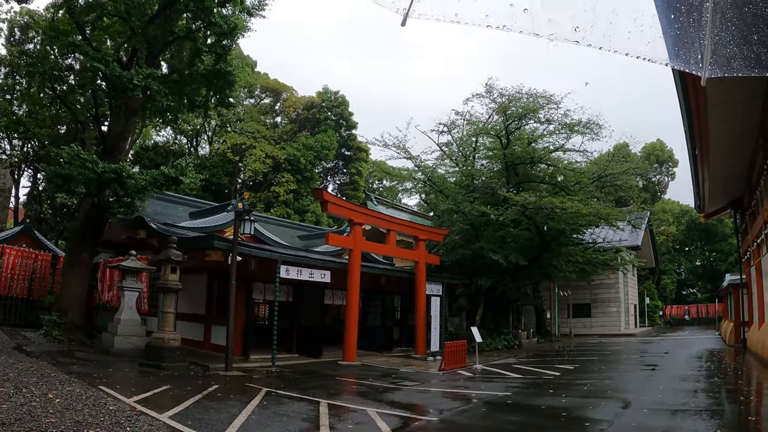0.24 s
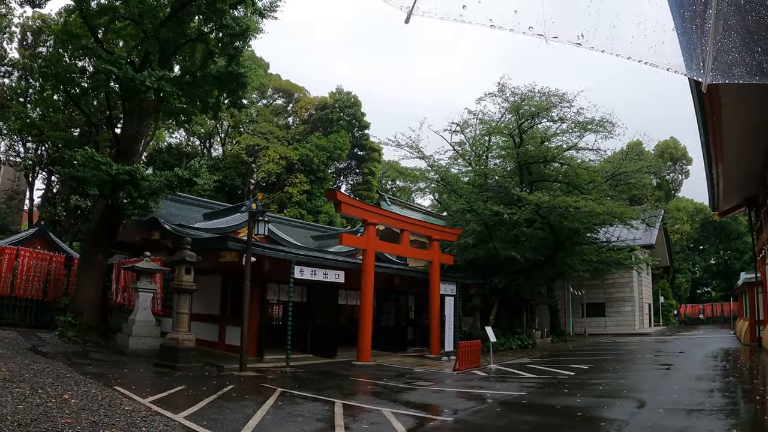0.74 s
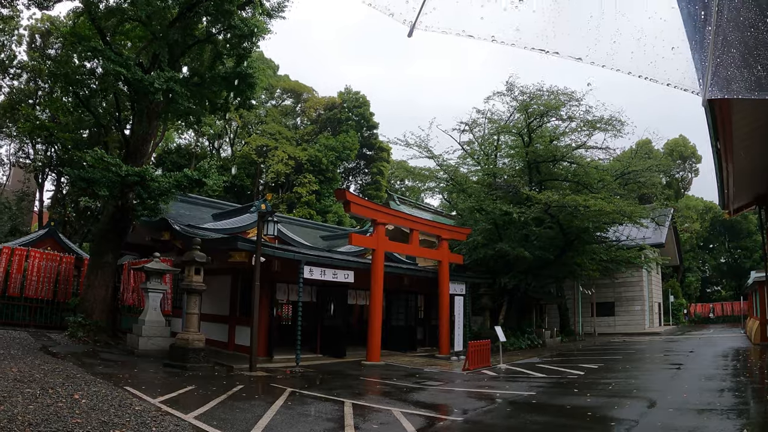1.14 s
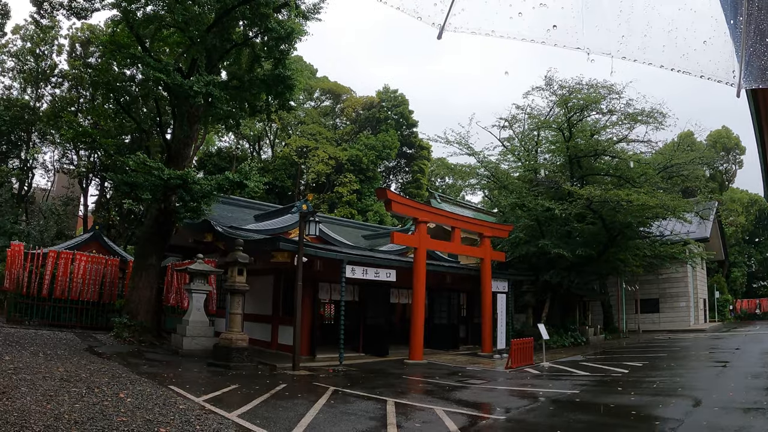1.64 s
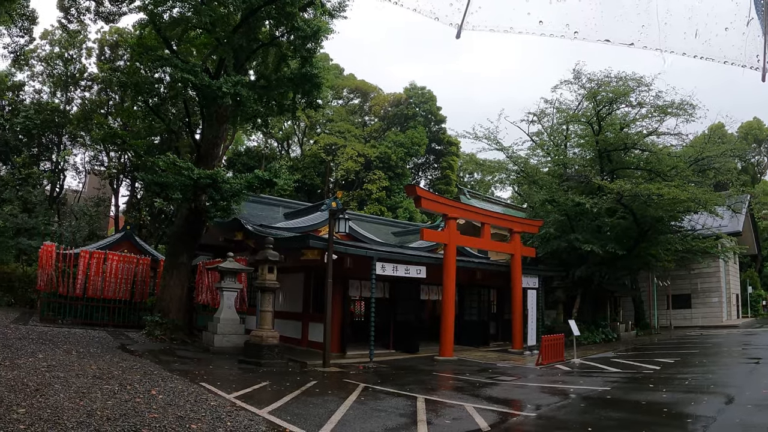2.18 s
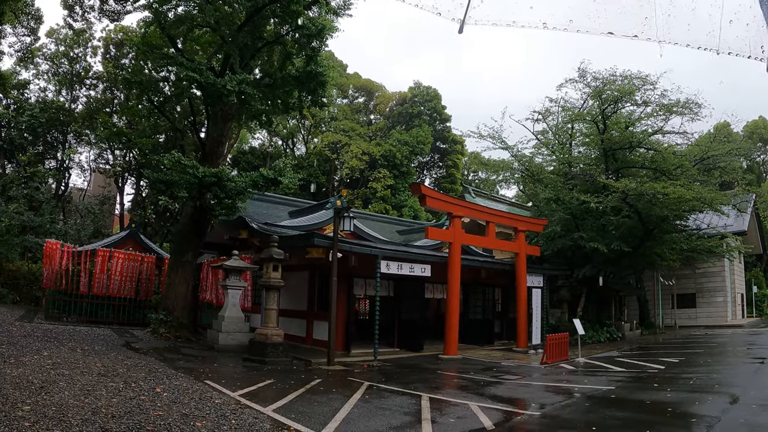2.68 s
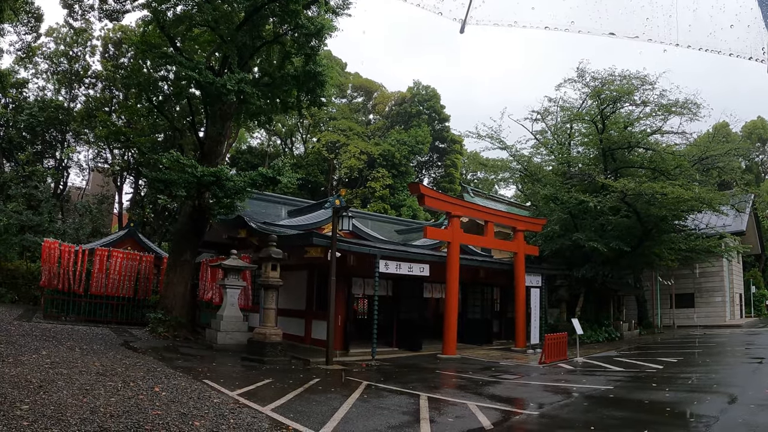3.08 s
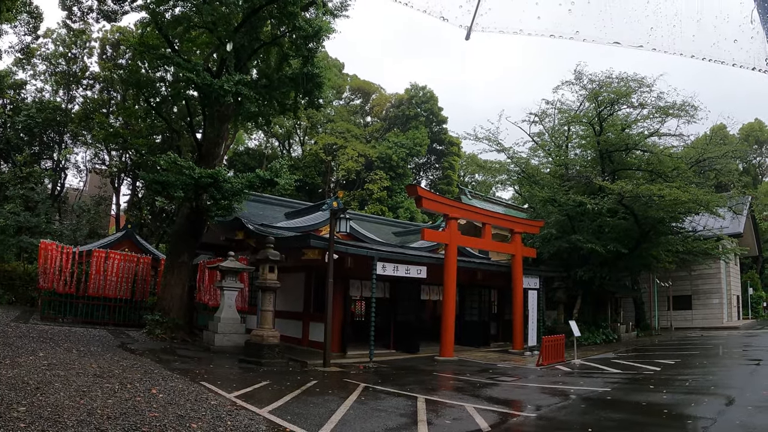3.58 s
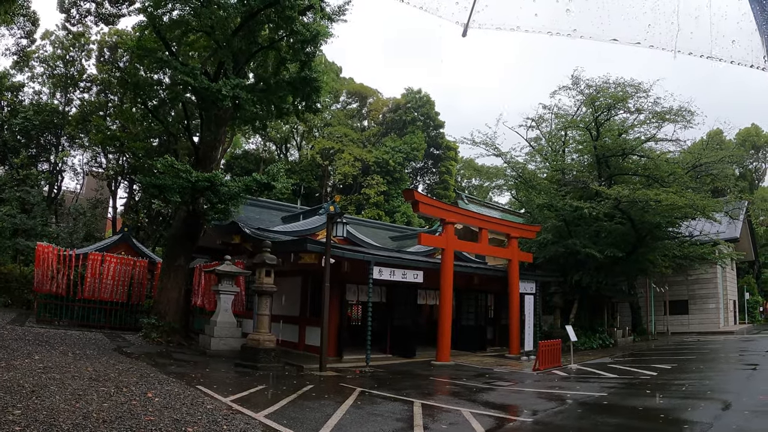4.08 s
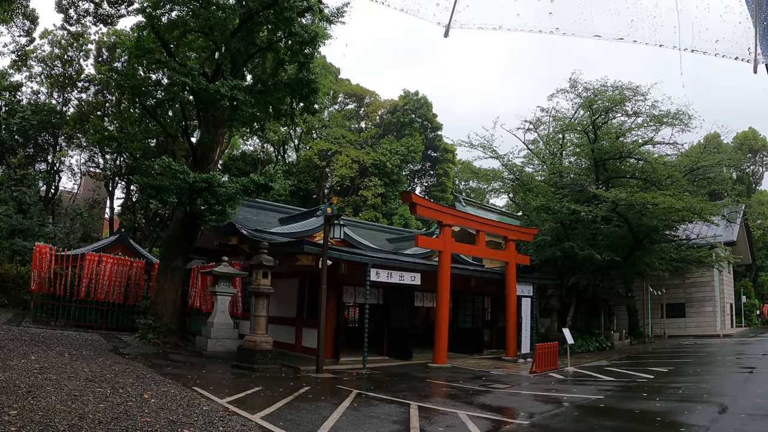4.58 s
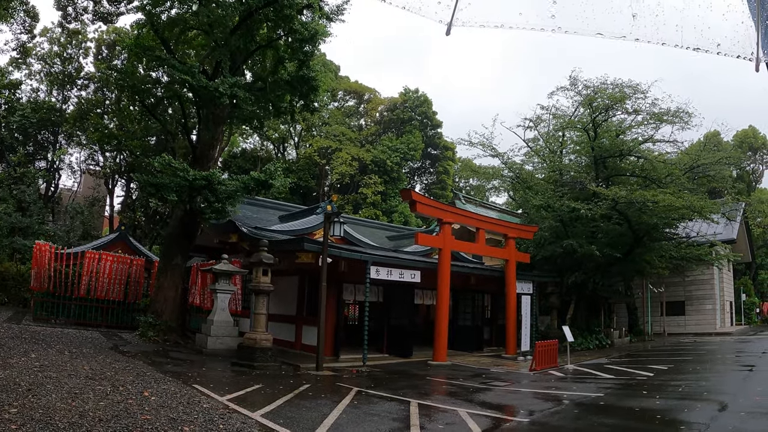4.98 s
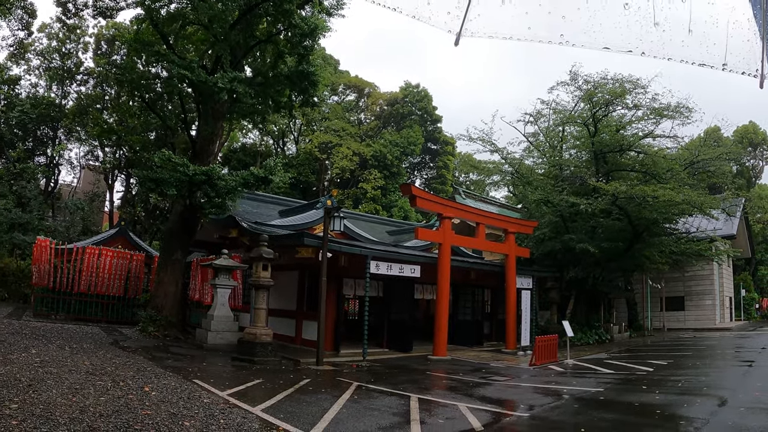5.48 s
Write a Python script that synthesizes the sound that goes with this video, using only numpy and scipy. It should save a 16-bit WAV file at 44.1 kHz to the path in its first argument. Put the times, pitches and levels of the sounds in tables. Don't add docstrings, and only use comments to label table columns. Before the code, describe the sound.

Irregular rain pelts an umbrella held right above the microphone. Punchy, rounded plastic pops come singly and in quick pairs, some hollow, some tighter and crisper near the ribs, mixed with soft pats, sharp ticks and wet sputters. The strongest blows land past the middle; the drumming continues to the end. Outdoors behind it, quiet rain hisses on stone and leaves over a low, wavering distant rumble. Close mono sound, almost no echo.

```python
import sys
import numpy as np
from scipy import signal
from scipy.fft import rfft, irfft
from scipy.io import wavfile
from scipy.ndimage import uniform_filter1d

SR = 44100
rng = np.random.default_rng(int(sys.argv[2]) if len(sys.argv) > 2 else 0)


def ratio(d):
    e = np.asarray(d, float) / 20
    return 10 ** e


def pcm_store(signal):
    levels = np.round(np.clip(np.atleast_2d(signal), -1, 1) * 32767)
    wavfile.write(sys.argv[1], SR, levels.astype(np.int16).T)


N = 252682


def rms_one(x):
    return x / np.sqrt(np.mean(x ** 2) + 1e-20)


def band(x, low_hz, high_hz):
    return signal.sosfilt(signal.butter(2, [low_hz, min(high_hz, .45 * SR)], "band", fs=SR, output="sos"), x)


def narrow_band(x, low_hz, high_hz):
    return band(band(x, low_hz, high_hz), low_hz, high_hz)


def drift(rate_hz):
    r = np.exp(-80 * np.pi * rate_hz / SR)
    noise = rng.standard_normal(N // 40 + 2002)
    slow = signal.lfilter([1], [1, -2 * r, r * r], noise)[2000:]
    return np.interp(np.arange(N) / 40, np.arange(len(slow)), rms_one(slow))


def coloured(spectrum, patchy_db, source):
    hz_points, db_points = np.transpose(spectrum)
    out = 0
    together = drift(15.0)
    edges = 20 * 2 ** np.arange(0, 10.1, .5)
    for k, (low, high) in enumerate(zip(edges, edges[1:])):
        middle = np.log(low * high) / 2
        level_db = np.interp(middle, np.log(hz_points), db_points, left=-60, right=-60)
        if level_db > -60:
            flicker_db = patchy_db * (.5 * together + drift(3.86))
            out = out + ratio(level_db + flicker_db) * band(source[k % 2], low, high)
    return rms_one(out)


def resonate(x, hz, t60):
    r, w = ratio(-60 / (t60 * SR)), 2 * np.pi * hz / SR
    return signal.lfilter([0, np.sin(w)], [1, -2 * r * np.cos(w), r * r], x + 1e-18)


def clicks_at(seconds, heights):
    out = np.zeros(N)
    np.add.at(out, np.clip(np.round(np.asarray(seconds) * SR).astype(int), 0, N - 1), heights)
    return out


def dying(clicks, seconds):
    return signal.lfilter([1], [1, -np.exp(-1 / (seconds * SR))], clicks + 1e-18)


def swelling(clicks, rise_s, fall_s):
    return dying(dying(clicks, rise_s) / (rise_s * SR) * 2, fall_s)


def bending_wave(stretch, softness):
    first_crest_s, growth, crest_bias = .00053, 2.33, .22
    swell_s, swell_decay = .0021, 1.21
    t = (np.arange(1200) + 1e-3) / SR / np.clip(stretch, .3, 2.5)
    rise = np.minimum(t / swell_s, 1) ** max(softness, 0)
    fall = np.exp(-swell_decay * np.maximum(t / swell_s - 1, 0))
    turns = np.log(t / first_crest_s) / np.log(growth)
    fade_in = np.clip(2 * turns + 1.6, 0, 1)
    wave = (np.cos(np.pi * turns) + crest_bias) * rise * fall * fade_in
    rounded = signal.lfilter(*signal.butter(4, 2600, fs=SR), wave)
    return signal.lfilter(*signal.butter(1, 105, "high", fs=SR), rounded)


def thuds(table):
    size = 1200
    out = np.zeros(N + size)
    t = np.arange(size) / SR
    shape = (1 - np.exp(-t / 0.0019)) * (np.exp(-t / 0.0018) + 0.033 * np.exp(-t / 0.029))
    shakes = rng.standard_normal((len(table), size)) * shape
    for (s, thud_db, stretch, softness, flutter_hz, flutter_db, _), shake in zip(table, shakes):
        flutter = rms_one(band(band(shake, flutter_hz / 2.2, flutter_hz * 1.7), 250, 1700))
        i = round(s * SR)
        out[i:i + size] += ratio(thud_db) * bending_wave(stretch, softness)
        out[i:i + size] += ratio(flutter_db - 9.0) * flutter
    return out[:N]


# (pitch [Hz], level [dB], time to die by 60 dB [s])
SHEET_TONES = [(118.5, -19, 0.034), (245, -32.5, 0.069), (533, -39, 0.15), (930, -28.5, 0.03)]


def sheet_ring(table):
    out = np.zeros(N)
    s, thud_db, *_ = np.transpose(table)
    strength_db = rng.normal(-2, 4.5, (len(table), len(SHEET_TONES)))
    for k, (hz, db, t60) in enumerate(SHEET_TONES):
        pushes = clicks_at(s + 0.002546, ratio(thud_db + db + 2.5 + strength_db[:, k]))
        out -= resonate(pushes, hz, t60)
    return out


# (pitch [Hz], level per Hz [dB])
SPLASH_COLOUR = [(1400, 5.5), (2800, 8), (4000, 1), (7500, 2.5), (10500, -25), (13500, -6), (16000, -9)]


def splashes(table):
    s, *_, splash_db = np.transpose(table)
    rise_s = .0012
    hits = dying(clicks_at(s - .001, ratio(splash_db + 2.5)), rise_s) / (rise_s * SR) * 2
    ragged = ratio(4.0 * drift(220.0))
    crack = dying(hits, 0.00072)
    tail = 0.13 * ragged * dying(hits, 0.014)
    noise = rng.standard_normal((2, N))
    spray = coloured(SPLASH_COLOUR, 3.0, crack * noise + narrow_band(tail * noise, 1360, 6000))
    return ratio(-3.5) * np.sqrt(np.mean((crack + tail) ** 2)) * spray


def drops(table):
    return thuds(table) + sheet_ring(table) + splashes(table)


def landed(table, flutter_hz, octaves, over_db):
    chance = rng.standard_normal((len(table), 2))
    return [(s, db, stretch, softness, flutter_hz * 2 ** (octaves * a), db + over_db + 2.0 * b, splash_db)
            for (s, db, stretch, softness, splash_db), (a, b) in zip(table, chance)]


# (time [s], thud level [dB], chirp stretch [ratio], softness of the front [power], splash level [dB])
MIDDLE_DROPS = [(0.1278, -8, 0.93, 0.58, -37), (0.1738, -6, 0.9, 0.72, -44.0),
                (0.1879, -4, 0.7, 2.6, -47.0), (0.2734, -9, 0.9, 0.55, -51.0),
                (0.3139, -5, 0.78, 0.91, -26.5), (0.4476, -5.6, 1, 0.62, -34.0),
                (0.4701, -5.9, 1.12, 2.0, -30), (0.5868, -5.5, 0.91, 0.68, -26.5),
                (0.6877, -11, 0.71, 0.21, -27.5), (0.9173, -5, 0.92, 0.55, -37),
                (0.9653, -7.5, 0.84, 0.14, -25), (1.093, -9.5, 0.85, 0.62, -31),
                (1.0972, -9.5, 0.78, 0.3, -28.5), (1.1235, -4, 0.87, 0.58, -36),
                (1.1377, -5, 0.81, 0.3, -28.5), (1.3497, -5.8, 0.87, 0.73, -33),
                (1.4162, -4.5, 1.13, 1.1, -37), (1.8172, -5, 0.88, 0.33, -45),
                (1.9055, -5.5, 0.92, 0.5, -34), (2.0095, -6, 0.5, 2.0, -32),
                (2.3604, -7.5, 0.91, 0.75, -47), (2.3665, -12.5, 0.84, 0.15, -46),
                (2.4769, -16, 0.98, 0.19, -42), (2.5287, -4.6, 0.9, 1.7, -24.5),
                (2.6555, -8.5, 1.25, 0.92, -51), (2.9171, -6.0, 0.84, 0.5, -28),
                (3.1295, -9.5, 0.91, 0.41, -31), (3.2312, -7.2, 0.8, 0.34, -26.5),
                (3.4725, -8.5, 0.92, 0.33, -45), (3.6434, -7.5, 0.82, 0.41, -26.5),
                (3.6624, -7, 0.86, 0.45, -35), (3.7018, -8.5, 0.86, 0.5, -35),
                (3.9065, -7, 0.82, 0.81, -34), (4.1289, -8.5, 0.93, 0.68, -36), (4.1365, -9, 1, 0.78, -34),
                (4.5706, -8, 0.96, 1.1, -38), (4.6198, -6, 1.3, 1.2, -36.0),
                (4.7216, -7.5, 0.93, 1.0, -41.0), (4.9265, -8.5, 0.83, 0.3, -32),
                (5.1423, -9, 1.03, 0.82, -30)]
# (time [s], thud level [dB], chirp stretch [ratio], softness of the front [power], splash level [dB])
RIBSIDE_DROPS = [(0.1417, -5.5, 0.86, 0.49, -27.5), (0.3766, -7.5, 0.83, 0.17, -40),
                 (0.6016, -6, 0.72, 0.63, -34), (0.6169, -5, 0.89, 0.68, -31),
                 (0.8955, -6.1, 0.77, 0.53, -31), (0.9761, -5.5, 0.88, 1.1, -38.0),
                 (1.514, -6.5, 0.83, 0.18, -27.5), (1.5359, -11.4, 0.63, 0.019, -23),
                 (1.7151, -2.8, 0.88, 0.62, -36), (1.936, -3.0, 0.75, 0.5, -33.0),
                 (2.0384, -4.5, 0.75, 0.67, -49.0), (2.105, -3.5, 0.69, 0.58, -32),
                 (2.1858, -6.5, 0.69, 0.3, -54.0), (2.2237, -7, 0.74, 0.0, -46.0),
                 (2.387, -7.5, 0.78, 0.54, -28), (2.512, -6, 0.7, 0.49, -38.0),
                 (2.5813, -8.5, 0.8, 0.1, -29), (2.6945, -9, 0.72, 0.0, -39),
                 (2.7673, -7.5, 0.71, 0.3, -24.5), (2.9746, -7, 0.78, 0.32, -39.0),
                 (3.1919, -11.7, 0.81, 0.11, -28), (3.3436, -6.5, 0.96, 1.7, -28),
                 (3.4652, -5.5, 0.57, 1.6, -39), (3.4824, 0.6, 0.74, 1.7, -38.0),
                 (3.8004, -0.5, 0.61, 2.0, -23.5), (3.8246, -7.8, 1, 0.074, -33),
                 (3.9584, -5.5, 0.79, 0.5, -43), (4.0511, -4, 0.7, 0.42, -37),
                 (4.08, -6.5, 0.72, 0.67, -30.5), (4.2503, -7, 0.64, 0.054, -31),
                 (4.4867, -6, 0.63, 0.15, -27), (4.5554, -5, 0.86, 0.23, -25.5),
                 (4.7123, -7, 0.78, 0.15, -29.0), (4.9162, -6.5, 0.81, 0.15, -27),
                 (4.96, -5, 0.85, 0.75, -37), (4.999, -7, 0.85, 0.23, -28), (5.0326, -7.5, 0.6, 1.4, -38),
                 (5.2919, -6, 0.78, 0.21, -27.5), (5.5393, -5, 0.73, 1.6, -20.5),
                 (5.637, -3, 0.67, 0.93, -32)]


def large_drops():
    return landed(MIDDLE_DROPS, 700, 0.66, -13.5) + landed(RIBSIDE_DROPS, 820, 0.52, -15)


def rebounds(large):
    chance = rng.standard_normal((len(large), 3))
    return [(s + .008 * 2 ** (0.286 * a), db - 27 + 5.0 * b, 1.6 * 2 ** (0.6 * c), 1, splash_db - 41)
            for (s, db, *_, splash_db), (a, b, c) in zip(large, chance)]


# (time [s], thud level [dB], chirp stretch [ratio], softness of the front [power], splash level [dB])
LIGHT_DROPS = [(0.1323, -19, 0.8, 4, -48), (0.1826, -37, 0.56, 0.56, -30), (0.1917, -18, 0.73, 19, -56),
               (0.4743, -10.5, 0.34, 0, -34), (0.479, -18, 0.94, 5, -43), (0.5479, -21, 0.95, -3, -35),
               (0.5927, -32, 0.33, -2, -37), (0.9714, -22, 0.5, -7, -36), (1.0263, -21, 1, -2.5, -50),
               (1.1015, -20, 0.65, 4, -47), (1.2192, -19, 0.54, -3.5, -48), (1.3779, -24, 0.59, 4, -39),
               (1.4225, -40, 1, 14, -34), (1.4864, -22.5, 0.58, 0, -37), (1.5185, -17, 0.23, 4, -43),
               (1.8216, -24, 0.21, -5, -32), (1.9405, -14, 0.51, 10, -42), (2.1094, -23, 0.83, -5, -32),
               (2.1676, -25, 0.37, 2, -31), (2.1759, -12.5, 0.3, -1.5, -38), (2.4822, -17, 0.37, 12, -33),
               (2.7231, -20, 0.45, -3, -38), (2.925, -27, 0.51, -12, -37), (3.1254, -16.5, 0.43, -5, -48),
               (3.1375, -19, 0.76, -2, -30), (3.2371, -30, 0.68, -2, -40), (3.3203, -13, 0.61, 0.3, -36),
               (3.3491, -17, 0.31, 8, -48), (3.3538, -18, 0.86, -0.5, -34),
               (3.4388, -23.5, 0.66, -1.7, -52), (3.4783, -13.5, 0.5, 9, -39), (3.8685, -26, 0.5, 4, -25),
               (4.0263, -15, 0.97, 6, -25.5), (4.2868, -13.5, 0.29, 1, -34), (4.7583, -11, 0.28, 6, -25),
               (5.2455, -14, 0.57, 2.5, -23.5), (5.2589, -9, 0.4, 0.8, -28.5),
               (5.5062, -17.5, 0.36, 1.5, -38), (5.5139, -17.5, 0.6, -4.5, -25), (5.5236, -9, 0.28, 6, -49),
               (0.2459, -21, 1.8, -0.3, -30), (0.359, -14, 1.4, 2, -38.9), (0.4536, -41, 0.97, 3, -48),
              (0.657, -13.5, 0.65, 1, -39), (0.9254, -23, 1.3, 0.86, -32), (0.983, -17, 1.36, -6.5, -45),
              (1.1467, -15, 0.4, 2, -39), (1.3406, -14, 1.42, 1, -45), (1.3733, -8.5, 0.52, 7, -29),
              (1.546, -20, 0.59, 0, -37), (1.719, -19, 1.96, 6, -49), (1.831, -20, 0.95, 0.5, -55),
              (1.857, -13.5, 2.1, 1.8, -32), (1.9008, -17, 1.2, 4, -40), (2.004, -20, 0.7, 3, -44),
              (2.0455, -32, 0.78, 4, -42), (2.1261, -13.5, 1.5, 4, -35), (2.2183, -8.5, 3.9, 9, -56),
              (2.4331, -22.5, 0.89, 0.2, -30), (2.474, -4, 0.64, -5, -37), (2.5174, -20, 0.62, 12, -41),
              (2.5501, -16, 1.16, 1.8, -34), (2.9128, -25, 0.65, -5, -36), (3.1935, -11, 0.49, -0.8, -41),
              (3.1982, -26, 1.7, 3.5, -32), (3.4901, -20, 0.48, 5, -41), (3.648, -41, 2.4, 1.4, -43),
              (3.7973, -13, 2.4, 7, -36), (3.81, -19, 0.83, -3, -52), (3.9304, -17, 0.71, 2, -32),
              (3.966, -33, 0.93, -4, -39), (4.5576, -12.5, 0.88, 3, -39),
              (4.6384, -19.5, 0.74, -1.5, -30.5), (4.7173, -39, 0.5, 7, -26), (4.7303, -11, 1.84, 24, -55),
              (5.1474, -39, 1.5, -5, -58), (5.228, -12.5, 0.97, 15, -36), (5.566, -14.5, 1.1, -0.5, -37.5),
              (5.5788, -18.5, 1.3, -0.3, -28.5), (5.6964, -11.5, 1.07, 1.2, -36)]


def small_drops():
    springing = rebounds(MIDDLE_DROPS + RIBSIDE_DROPS)
    return landed(LIGHT_DROPS + springing, 1140, 0.35, -15)


# (time [s], tap level [dB], splash level [dB])
SHARP_TAPS = [(0.303, -20, -29), (1.079, -28, -57), (1.2622, -25, -31.5), (1.322, -42, -58),
              (1.332, -33, -57), (2.0743, -24, -44), (4.343, -27.5, -54), (4.66, -24, -44),
              (4.7025, -24, -60), (4.9337, -22, -58), (5.127, -25, -57)]
# (time [s], peak level [dB])
FAR_TAPS = [(0.718, -16.5), (0.732, -23), (0.799, -32), (0.817, -21), (1.189, -17.5), (1.583, -22),
            (1.608, -23), (1.796, -19), (2.15, -23), (2.254, -20), (2.291, -23), (2.732, -25), (2.739, -19),
            (2.892, -28), (2.957, -14.5), (3.014, -18), (3.172, -15.5), (3.427, -23), (4.159, -15),
            (4.217, -20), (4.606, -18.5), (4.899, -21), (5.217, -27), (5.4, -23), (5.615, -20)]


def taps():
    near = [(s, db, .7, .4, 1300, db - 10, splash_db) for s, db, splash_db in SHARP_TAPS]
    far = [(s, db - 7, 0.51, .3, 1200, db - 24.5, db - 30.5) for s, db in FAR_TAPS]
    return near + far


# (time [s], peak level [dB], body below 5 kHz [dB])
RIM_SPITS = [(0.495, -28, 7), (0.525, -36, 7), (1.3847, -32, -9), (1.42, -21.5, -4), (1.4542, -38, 10),
             (1.4619, -38, 1), (2.031, -26, -3), (2.3808, -30, 7), (2.5375, -43, 17), (2.753, -22.5, 0.5),
             (2.757, -34, 5), (2.944, -26.5, 5), (2.949, -29.5, 6), (2.961, -40, 17), (3.292, -30, 3),
             (3.302, -42, 11), (3.856, -26, 4), (3.8674, -22, 0), (3.8904, -46, 18), (4.403, -28, -2),
             (4.4976, -38, 6), (4.5154, -35, -12), (4.583, -52, 27), (4.6607, -40, 13), (5.0069, -48, 7),
             (5.086, -26, -2), (5.1043, -33, -6), (5.303, -40, 10), (5.5149, -55, 19), (5.648, -25, -16)]


def spits():
    s, peak_db, body_db = np.transpose(RIM_SPITS)
    noise = rng.standard_normal((2, N))
    faint_db = -46.5 + 4.6 * np.minimum(rng.exponential(1, N), 2)
    faint = (rng.random(N) < 60 / SR) * ratio(faint_db)
    hits = clicks_at(s, ratio(peak_db + 2.0))
    body = clicks_at(s, ratio(peak_db + body_db - 3.0))
    crack = band(noise[0] * (dying(hits, 0.00011) + 0.16 * dying(hits, 0.021)), 7800, 22000)
    mist = narrow_band(noise[1] * dying(faint, 0.0014), 8500, 15500)
    return crack + mist + band(noise[1] * dying(body, 0.0028), 2900, 5940)


# (time [s], peak level [dB])
FILM_SNAPS = [(0.1735, -52), (0.1875, -48), (0.2264, -54), (0.2453, -47), (0.4444, -55), (0.4768, -54),
              (0.5866, -54), (0.8954, -52), (0.9657, -54), (0.9762, -42), (1.0979, -60), (1.1373, -53),
              (1.3498, -52), (1.3733, -36), (1.4242, -68), (1.4242, -53), (1.514, -52), (1.5354, -46),
              (1.936, -55), (2.0088, -54), (2.1046, -52), (2.2238, -59), (2.38, -44), (2.4768, -48),
              (2.5122, -51), (2.5287, -42), (2.581, -48), (2.7362, -52), (2.7501, -44), (2.9173, -39),
              (2.9487, -48), (3.0834, -51), (3.1921, -47), (3.2311, -45), (3.4106, -46), (3.4825, -47),
              (3.7998, -47), (3.8676, -57), (3.8676, -34), (3.9295, -51), (3.9584, -49), (4.0517, -53),
              (4.0801, -51), (4.1285, -54), (4.2497, -56), (4.4039, -41), (4.4862, -52), (4.5146, -49),
              (4.555, -49), (4.6593, -53), (4.7117, -44), (4.9162, -54), (4.9576, -50), (4.9985, -47),
              (5.0848, -53), (5.1033, -52), (5.1422, -52), (5.2589, -44), (5.2919, -47), (5.5388, -54)]


def snaps():
    s, peak_db = np.transpose(FILM_SNAPS)
    swell = swelling(clicks_at(s, ratio(peak_db + 20)), rise_s=.0008, fall_s=.0008)
    return narrow_band(rng.standard_normal(N) * swell, 10000, 15300)


# (time [s], pitch [Hz], level [dB])
BLOW_FIZZ = [(0.172, 2410, -32.5), (.192, 2400, -38), (.588, 2360, -37), (0.897, 2060, -38),
             (0.976, 2190, -35.5), (1.096, 1980, -32), (1.141, 2790, -39), (1.418, 2900, -40),
             (1.717, 2320, -43), (2.011, 2380, -39.5), (2.107, 2100, -48), (2.226, 2530, -42),
             (2.478, 2420, -36), (2.512, 2860, -34), (2.581, 2550, -38), (2.919, 2690, -34),
             (3.129, 2310, -35.5), (3.346, 2630, -32), (3.484, 2660, -31), (3.799, 2800, -37),
             (4.049, 2980, -41), (4.249, 2750, -40), (4.487, 2270, -45), (4.723, 2330, -30.5),
             (4.997, 2700, -42),
             (.617, 890, -46), (.688, 840, -36), (1.514, 820, -31), (1.536, 910, -36), (1.936, 820, -29),
             (2.58, 810, -34), (2.769, 1130, -36), (3.19, 980, -34), (3.232, 950, -27), (3.823, 1020, -42),
             (4.051, 800, -31), (4.081, 950, -39), (4.08, 2350, -41), (4.486, 835, -38), (4.571, 930, -36),
             (4.711, 970, -33), (4.916, 960, -39), (4.998, 910, -40), (5.637, 824, -43)]


def fizz():
    size = 1700
    out = np.zeros(N + size)
    blows = BLOW_FIZZ
    for (s, hz, db), noise in zip(blows, rng.standard_normal((len(blows), size))):
        i = round(s * SR) - size // 2
        hiss = rms_one(narrow_band(noise, hz - 300, hz + 300))
        out[i:i + size] += ratio(db + 0.5) * np.hanning(size) * hiss
    return out[:N]


# (pitch [Hz], level per Hz [dB])
BLUR_COLOUR = [(330, 12.5), (900, 6.5), (1600, -0.5), (2900, -3), (5000, -24), (8000, -5), (10000, -77)]


def blur(dry):
    power = band(dry[0], 1240, 7300) ** 2
    spread = uniform_filter1d(uniform_filter1d(power, size=700), size=300)
    strength = np.sqrt(np.maximum(spread, 0))
    return coloured(BLUR_COLOUR, 3.0, rng.standard_normal((2, N))) * strength * ratio(-6)


# (time [s], town rumble level [dB], drizzle on the sheet level [dB])
BACKGROUND = [
    (0.0, -35, -40),
    (0.43, -31.5, -33),
    (0.85, -36, -51),
    (2.12, -36.5, -37.5),
    (2.86, -34.5, -45.5),
    (4.04, -34.5, -35.5),
    (4.4, -36.5, -42.5),
    (5.5, -35, -60),
    (5.73, -34.5, -34.5),
]


def weather():
    s, *levels = np.transpose(BACKGROUND)
    return [np.interp(np.arange(N) / SR, s, level_db) for level_db in levels]


def drizzle(per_s, spread_db):
    sizes = ratio(spread_db * np.minimum(rng.exponential(1, N), 3.5)) * (rng.random(N) < per_s / SR)
    dealt = rng.integers(0, 4, N)
    out = 0
    for k, stretch in enumerate([.4, .55, .8, 1.2]):
        out = out + signal.fftconvolve(sizes * (dealt == k), bending_wave(stretch, 0.77))[:N]
    return rms_one(out)


# (pitch [Hz], level per Hz [dB])
PAVING_COLOUR = [(100, -10), (150, 6), (400, -5), (550, -3), (820, -4.5), (1900, -15), (4000, -17),
                 (7600, -29.5), (11000, -16.5), (16000, -44)]


def paving(per_s, hiss_db):
    sizes = ratio(0.99 * np.minimum(rng.exponential(1, N), 4.5))
    grains = sizes * (rng.random(N) < per_s / SR) * rng.choice([-1, 1], N)
    source = rms_one(grains) + ratio(hiss_db) * rng.standard_normal((2, N))
    return coloured(PAVING_COLOUR, 1.7, source)


# (pitch [Hz], level per Hz [dB])
RUMBLE_COLOUR = [(12, -35), (20, 5), (76, 9.5), (400, -18), (520, -49), (880, -120)]


def town_rumble():
    return coloured(RUMBLE_COLOUR, 2.2, rng.standard_normal((2, N)))


def scene():
    rumble_db, drizzle_db = weather()
    on_sheet = drops(large_drops() + small_drops() + taps())
    fine = ratio(drizzle_db - 5.5) * drizzle(per_s=150, spread_db=3.5)
    ground = ratio(-41.5) * paving(per_s=900, hiss_db=7.0)
    rumble = ratio(rumble_db) * town_rumble()
    return (on_sheet + spits() + snaps() + fine + ground + rumble)[None]


# (pitch [Hz], level [dB])
MICROPHONE_COLOUR = [(4, -28), (16, -0.5), (7900, 0), (9000, -10), (10400, -14), (11000, -20), (13000, -17),
                     (14300, -21), (15700, -26)]


def microphone(dry):
    ceiling = .7
    rounded = ceiling * np.tanh(dry / ceiling)
    hz = np.arange(N // 2 + 1) * SR / N + 1
    hz_points, db_points = np.transpose(MICROPHONE_COLOUR)
    colour = ratio(np.interp(np.log(hz), np.log(hz_points), db_points))
    return irfft(rfft(rounded) * colour * (hz < 15800), N)


def band_limit(x):
    return signal.sosfilt(signal.butter(12, 15710, fs=SR, output="sos"), x)


def record(dry):
    return band_limit(microphone(dry) + blur(dry) + fizz())


dry = scene()
out = record(dry)
pcm_store(out)
```